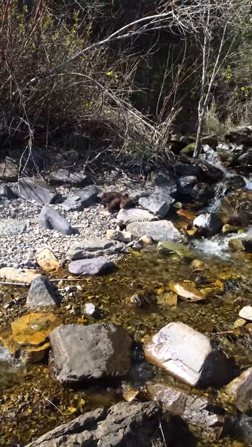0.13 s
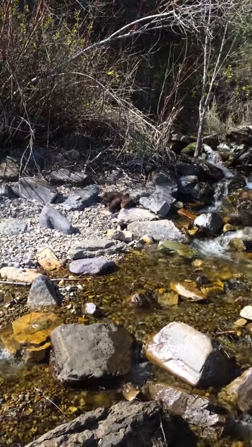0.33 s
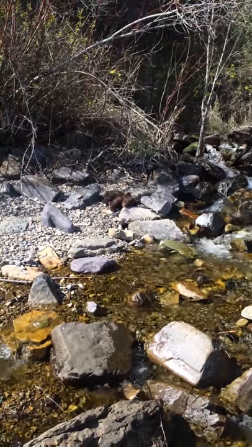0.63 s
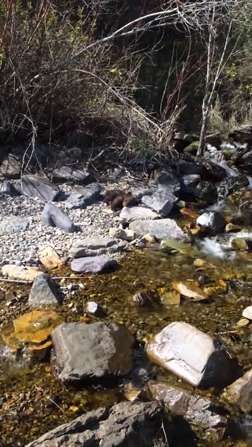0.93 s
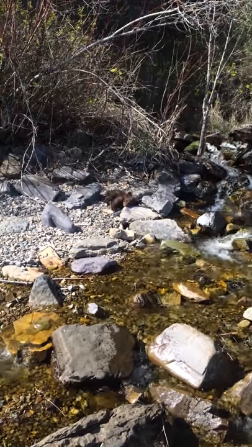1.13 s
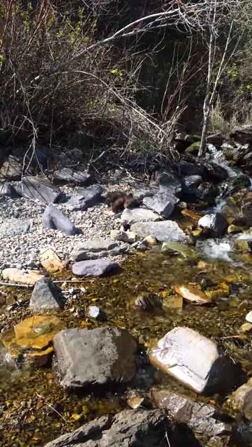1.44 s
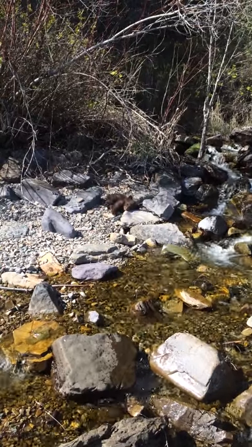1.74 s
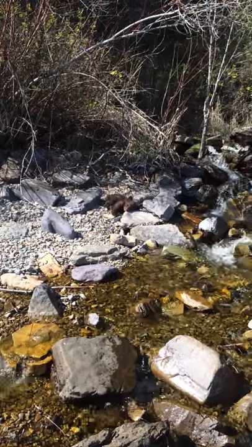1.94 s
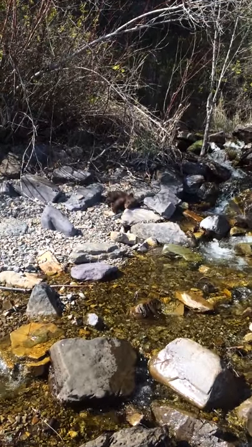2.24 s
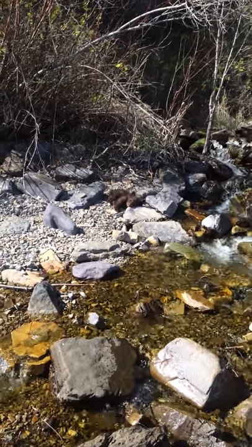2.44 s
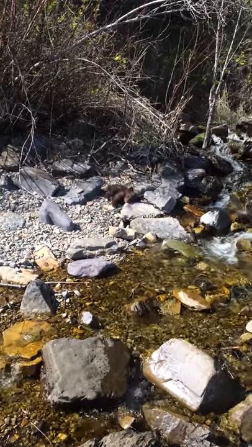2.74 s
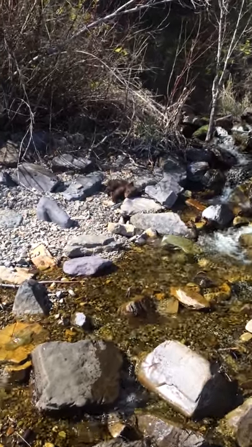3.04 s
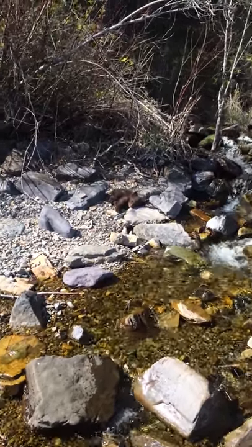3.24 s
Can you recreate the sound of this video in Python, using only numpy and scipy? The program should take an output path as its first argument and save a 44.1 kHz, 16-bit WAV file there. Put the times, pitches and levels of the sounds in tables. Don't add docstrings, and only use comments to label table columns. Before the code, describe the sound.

A shallow stream rushes steadily over stones, frothy and slightly muffled on top, with small bubble pops, faint droplet ticks and low hollow glugs; outdoors, a few metres from the microphone, wind buffets softly later.

```python
import sys
import numpy as np
from scipy import signal
from scipy.fft import rfft, irfft, next_fast_len
from scipy.io import wavfile
from scipy.ndimage import uniform_filter1d, map_coordinates

SR = 44100
rng = np.random.default_rng(int(sys.argv[2]) if len(sys.argv) > 2 else 0)


def to_wav(sig):
    pcm = np.clip(np.atleast_2d(sig), -1, 1) * 32767
    pcm = np.round(pcm).astype(np.int16)
    wavfile.write(sys.argv[1], SR, pcm.T)


def nominal_scale(level):
    x = np.asarray(level, float) / 20
    return 10 ** x


N = 148617
START_S = .1204

# [t/s, level/dB]
WIND_STRENGTH = [(.15, -58), (.45, -63), (.8, -52), (1.1, -64), (1.35, -57), (1.55, -58), (1.8, -55),
                 (2.0, -60), (2.14, -41), (2.28, -46), (2.5, -57), (2.72, -63), (2.95, -57), (3.15, -44.5),
                 (3.35, -44)]
# [f/Hz, level/dB per Hz]
WIND_SPECTRUM = [(15, -27), (25, -17), (65, -8.5), (134, -1), (162, -60), (200, -25), (260, -46),
                 (440, -120)]
# [t/s, peak level/dB, f/Hz]
AIR_PUSHES = [(.42, -39, 70.4), (.615, -53, 55), (.78, -43, 71), (1.27, -50, 60.6), (1.8, -36, 85),
              (1.85, -33, 65), (1.94, -34, 70), (2.2, -28.5, 97), (2.24, -27.5, 75), (2.3, -29, 61.6),
              (2.345, -30, 60.3), (2.49, -33.5, 69.5), (2.82, -37, 65), (2.97, -36, 60), (3.08, -41, 74),
              (3.185, -25.5, 64), (3.275, -25, 71.4), (3.335, -31, 80)]
# [f/Hz, level/dB per Hz]
HOLLOW_SPECTRUM = [(15, -70), (30, -38), (90, -33), (125, -7), (175, 1.9), (215, -2.5), (270, -14),
                   (400, -41)]
# [t/s, peak level/dB, f/Hz]
HOLLOW_GLUGS = [(0.232, -32, 214), (0.29, -27.5, 198), (0.69, -35, 207), (0.817, -29, 170),
                (0.999, -31, 174), (1.118, -26.5, 184), (1.298, -29.5, 182), (1.447, -36, 226),
                (1.611, -24.5, 179.6), (1.731, -26.5, 194), (1.931, -28, 215), (2.1, -26, 172),
                (2.5, -37, 184), (2.657, -39, 178), (2.708, -27, 181), (2.784, -25.5, 169),
                (2.891, -49, 183), (2.948, -42, 192), (3.11, -29.5, 188), (3.239, -31, 201)]
# [t/s, peak level/dB, f/Hz]
NEAR_POPS = [(0.138, -22, 2060), (0.348, -21.5, 2760), (0.621, -24, 3420), (0.622, -22, 1510),
             (0.668, -20, 2030), (0.631, -23, 2100), (0.6822, -16.5, 1790), (0.7395, -23, 1240),
             (0.9463, -19.5, 3550), (0.9935, -27, 3850), (1.034, -20, 2150), (1.0494, -19, 2630),
             (1.38, -25, 3570), (1.4575, -18.5, 2290), (1.475, -25.5, 1510), (1.598, -19, 2320),
             (1.68, -27, 607), (1.7195, -22, 3460), (1.8566, -22, 3400), (2.3207, -22, 3340),
             (2.347, -26, 3600), (2.487, -25, 3200), (2.586, -26, 2540), (2.6425, -30, 3250),
             (2.885, -30, 4220), (3.117, -32, 3640), (3.2045, -26, 3550), (3.2683, -19.5, 3040)]
# [t/s, peak level/dB, f/Hz]
DROPLET_TICKS = [(0.287, -46, 7320), (0.329, -49, 7580), (0.6827, -55, 10600), (0.9243, -44, 8900),
                 (0.94, -56, 12000), (0.972, -33, 5400), (1.166, -44, 6800), (1.4573, -42, 9730),
                 (1.4573, -35, 6370), (1.7875, -58, 14100), (1.7878, -37, 9700), (1.9707, -46, 8010),
                 (2.121, -41, 5770), (2.146, -45, 6500), (2.505, -50, 8785), (2.766, -44, 6800),
                 (2.886, -46, 8500), (3.0076, -40, 4740), (3.096, -42, 5340), (3.136, -51, 10080),
                 (3.226, -41, 7200), (3.2336, -44, 8785), (3.264, -42, 8000), (3.2688, -35, 5340)]
# [t/s, level/dB]
FLOW_STRENGTH = [(.15, -31), (.45, -30.5), (.66, -30.5), (.9, -31), (1.2, -30.5), (1.5, -31.5), (1.75, -31),
                 (1.95, -30.5), (2.2, -31.5), (2.5, -30.5), (2.8, -31.5), (3.05, -30.5), (3.35, -30)]
# [f/Hz, level/dB per Hz]
WATER_SPECTRUM = [(150, -57), (250, -4.5), (690, -2), (1490, -2.33), (1780, -4), (2100, -3.06),
                  (2620, -3.55), (3100, -8)]
# [f/Hz, level/dB]
PORT_RESPONSE = [(3100, -.1), (3700, -3.65), (4100, -11), (5000, -16), (7000, -25.5), (10000, -35.5)]

WIND_DB, WIND_LUMP_DB = 0.4, 1
DRONE_DB, DRONE_SWAY_DB = -45.5, .8
RUSH_DB, FROTH_DB, SPRAY_DB = -1.8, -3.5, -8.5
FLOW_SWAY_DB = .3
BIGGEST_SPREADS = 4.5
TOP_HZ, TOP_DB = 16000, -10


def unit(x):
    return x / np.sqrt(np.mean(x ** 2) + 1e-20)


def curve(rows):
    return np.interp(np.arange(N) / SR, *np.transpose(rows))


def wobble(rate_hz):
    knots = rng.standard_normal(400)
    return map_coordinates(knots, [np.arange(N) * rate_hz / SR], mode="wrap")


def coloured(x, points):
    size = next_fast_len(N + 8192)
    f, db = np.transpose(points)
    bins_hz = np.fft.rfftfreq(size, 1 / SR)
    gain = nominal_scale(np.interp(np.log(bins_hz + 1), np.log(f + 1), db))
    return unit(irfft(rfft(x, size) * gain, size)[:N])


def patchy_noise(patchy_db):
    z = signal.stft(rng.standard_normal(N), nperseg=256)[2]
    field = uniform_filter1d(rng.standard_normal(z.shape), size=5, axis=0)
    field = uniform_filter1d(field, size=12, axis=1)
    return signal.istft(z * nominal_scale(patchy_db * unit(field)), nperseg=256)[1][:N]


def bubbles(s, gain, hz, cycles, rise, onset, size):
    start = np.round(s * SR).astype(int)
    u = np.arange(size) / SR * hz[:, None]
    attack = 1 - np.exp(-u / onset)
    decay = nominal_scale(-60 * u / cycles)
    fade = np.hanning(2 * size)[size:]
    phase = 2 * np.pi * u * (1 + rise * np.minimum(u / cycles, 1))
    wave = gain[:, None] * attack * decay * fade * np.sin(phase)
    place = start[:, None] + np.arange(size)
    return np.bincount(place.ravel(), wave.ravel(), N + SR)[:N]


def swarm(lo_hz, hi_hz, spread_db, cycles, rise, onset, count, size):
    when, pitch, strength = rng.random((count, 3)).T
    hz = lo_hz * (hi_hz / lo_hz) ** pitch
    spreads = np.minimum(-np.log(1 - strength), BIGGEST_SPREADS)
    gain = hz / hi_hz * nominal_scale(spread_db * spreads)
    return bubbles(when * N / SR, gain, hz, cycles, rise, onset, size)


def single_bubbles(rows, gain_db, cycles, rise, onset, size):
    s, db, hz = np.transpose(rows)
    return bubbles(s, nominal_scale(db + gain_db), hz, cycles, rise, onset, size)


def wind():
    level_db = curve(WIND_STRENGTH) + WIND_DB + WIND_LUMP_DB * wobble(14)
    rumble = nominal_scale(level_db) * coloured(rng.standard_normal(N), WIND_SPECTRUM)
    pushes = single_bubbles(AIR_PUSHES, gain_db=4.5, cycles=8.2, rise=0.022, onset=0.69, size=8192)
    return rumble + pushes


def hollow():
    level_db = DRONE_DB + DRONE_SWAY_DB * wobble(9.15)
    drone = nominal_scale(level_db) * coloured(rng.standard_normal(N), HOLLOW_SPECTRUM)
    glugs = single_bubbles(HOLLOW_GLUGS, gain_db=-5.0, cycles=41, rise=0.15, onset=0.66, size=8192)
    return drone + glugs


def near_drops():
    pops = single_bubbles(NEAR_POPS, gain_db=3, cycles=34, rise=.04, onset=1.3, size=1024)
    ticks = single_bubbles(DROPLET_TICKS, gain_db=7, cycles=26, rise=.03, onset=1.4, size=256)
    return pops + ticks


def stream():
    water_end_db = WATER_SPECTRUM[-1][1]
    port_fall = PORT_RESPONSE[1:] + [(TOP_HZ, PORT_RESPONSE[-1][1] + TOP_DB)]
    colour = WATER_SPECTRUM + [(hz, db + water_end_db) for hz, db in port_fall]
    flow_db = curve(FLOW_STRENGTH) + FLOW_SWAY_DB * wobble(4.9)

    rush = nominal_scale(RUSH_DB + 0.13 * wobble(12)) * coloured(patchy_noise(patchy_db=0.22), colour)
    froth = swarm(300, 9000, spread_db=2.2, cycles=34, rise=.08, onset=1.4, count=12000, size=416)
    froth = nominal_scale(FROTH_DB + 0.2 * wobble(21.51)) * coloured(froth, colour)
    spray = swarm(3000, 16000, spread_db=2.8, cycles=9, rise=.05, onset=.5, count=7000, size=96)
    spray = nominal_scale(SPRAY_DB + 1.1 * wobble(18)) * coloured(spray, colour)
    return nominal_scale(flow_db) * (rush + froth + spray)


def scene():
    return (wind() + hollow() + near_drops() + stream())[None]


def top_cut(x):
    return signal.sosfilt(signal.butter(12, 15200, fs=SR, output="sos"), x)


def record(dry):
    started = np.arange(N) >= START_S * SR
    return top_cut(dry * started)


dry = scene()
out = record(dry)
to_wav(out)
```